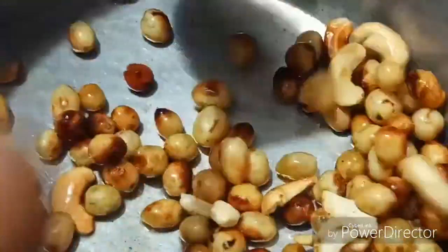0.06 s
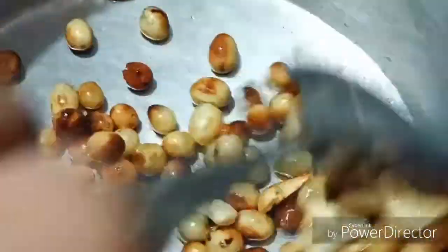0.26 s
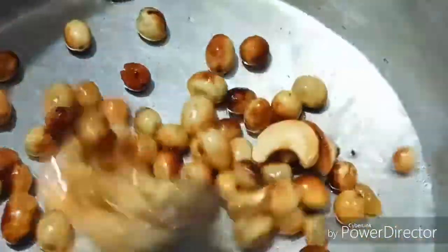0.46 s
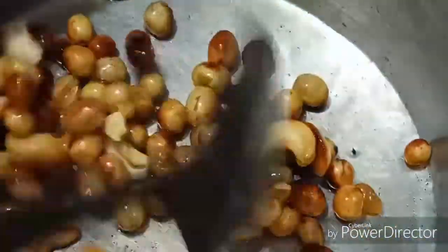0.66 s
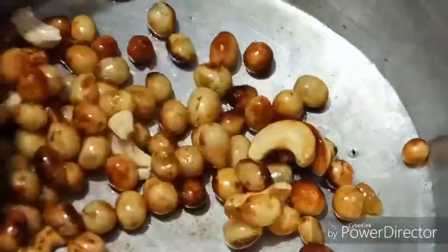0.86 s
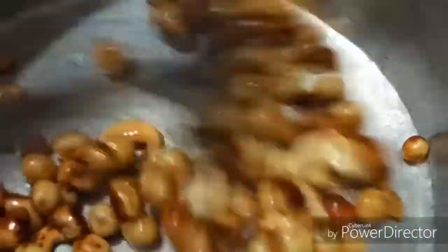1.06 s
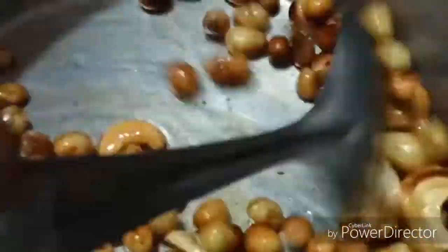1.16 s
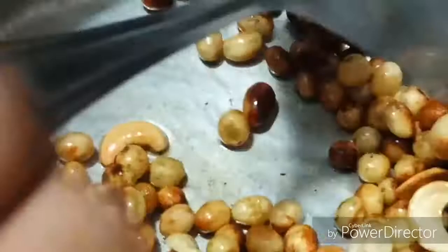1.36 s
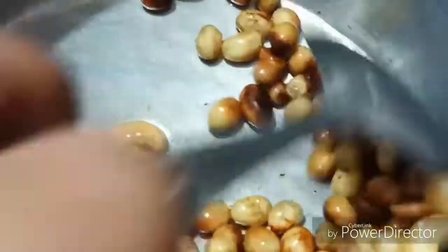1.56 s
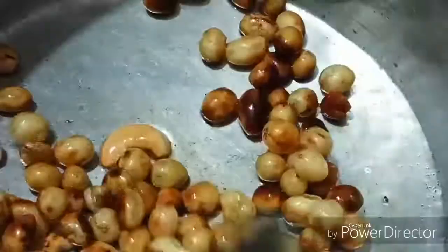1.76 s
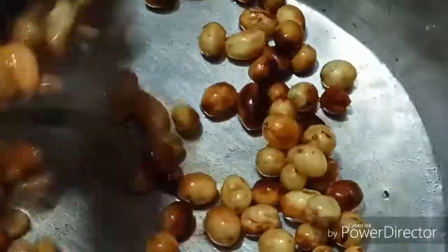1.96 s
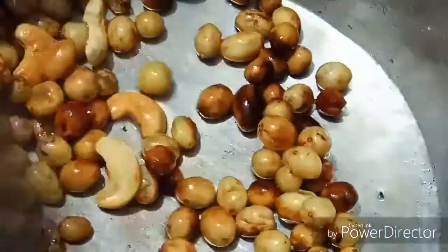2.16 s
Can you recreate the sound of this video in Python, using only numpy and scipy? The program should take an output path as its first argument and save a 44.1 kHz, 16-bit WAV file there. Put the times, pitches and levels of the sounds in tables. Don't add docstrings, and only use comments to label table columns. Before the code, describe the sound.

A metal spoon scrapes and taps a thin steel pan, tumbling rattling nuts in three quick strokes

```python
import sys
import numpy as np
from scipy import signal
from scipy.fft import rfft, irfft
from scipy.io import wavfile
from scipy.ndimage import uniform_filter1d

SR = 44100
rng = np.random.default_rng(int(sys.argv[2]) if len(sys.argv) > 2 else 0)


def put_to_file(sound):
    columns = np.atleast_2d(sound).T
    safe = np.clip(columns, -1, 1)
    whole_steps = np.round(safe * 32767)
    wavfile.write(sys.argv[1], SR, whole_steps.astype(np.int16))


def ratio(d):
    e = np.asarray(d, float) / 20
    return 10 ** e


N = 97020

# pitch_hz [Hz], level_db [dB], t60_s [s]
PAN_FLOOR = [(240, -42, 0.3), (308.5, -10.5, .18), (573, -18.5, 0.32), (640, -46, 0.17), (740, -35, .2),
             (752, -0.5, .2), (785, -8, .3), (834, 6, 0.36), (884.8, 5, .25), (935, -23, .15)]
# pitch_hz [Hz], level_db [dB], t60_s [s]
SPOON = [(784, -22.5, .2), (1017, -12, .2), (1067, -5, .2), (1112, -7.5, .2), (1321, -17, .2),
         (1336, -15, .2), (1405.5, 2.5, 0.3), (1443, -1.5, 0.14), (1525, -2, 0.38), (1577, -5, .25)]
# pitch_hz [Hz], level_db [dB], t60_s [s]
WALL = [(2120, -21.5, 0.36), (2223, 10, 0.091), (2235, 7, 0.053), (2288, 5.5, 0.25), (2630, 2, 0.052),
        (2720, 8, 0.17), (3008, 14, .08), (3160, 11, 0.064), (3410, 2, 0.102), (3643, 4, 0.18),
        (3490, 1.5, .08), (3786, 14, .1), (3994, -2, .08), (4148, 0.5, 0.3)]
# pitch_hz [Hz], level_db [dB], t60_s [s]
RIM = [(4940, 5.7, 0.017), (6036, 5.2, 0.021), (6680, 1.7, 0.15), (8220, 1, 0.01)]
RIM_DB = -10
LONGEST_T60_S = .16


def unit(x):
    return x / np.sqrt(np.mean(x ** 2) + 1e-30)


def conv(x, h):
    return signal.fftconvolve(x, h)[:len(x)]


def band(x, hz, width):
    return signal.lfilter(*signal.iirpeak(hz, hz / width, SR), x)


def colour(x, points):
    hz, db = np.array(points).T
    f = np.arange(len(x) // 2 + 1) * SR / len(x) + 1
    gain = ratio(np.interp(np.log(f), np.log(hz), db))
    return irfft(rfft(x) * gain, len(x))


def walk(rate):
    hold = int(SR / rate)
    levels = np.repeat(rng.standard_normal(200), hold)[:N]
    return 1.2 * uniform_filter1d(levels, hold)


def mode(x, hz, t60):
    r = np.exp(-np.log(1000) / (max(t60, .005) * SR))
    angle = 2 * np.pi * hz / SR
    gain = np.sin(angle) * np.sqrt(4 * (1 - r))
    return signal.lfilter([0, gain], [1, -2 * r * np.cos(angle), r * r], x)


def ring(push, hz, t60):
    y = mode(push, hz, t60)
    return y / np.max(np.abs(y))


def ring_all(push, modes, peak_db):
    return sum(ratio(peak_db + db) * ring(push, hz, t60) for hz, db, t60 in modes)


def chatter():
    rise_s, decay_s = .0015, .0035
    t = np.arange(int(.4 * SR)) / SR
    return (1 - np.exp(-t / rise_s)) * np.exp(-t / decay_s) * rng.standard_normal(len(t))


def add(out, s, x):
    i = int(s * SR)
    out[i:i + len(x)] += x[:N - i]


def burner():
    flame_bands = [(91, 23, -64.5), (122, 25, -68.5), (187, 53, -79.5), (272, 120, -76.5), (62, 40, -82.5)]
    out = np.zeros(N)
    for hz, width, db in flame_bands:
        roar = band(band(rng.standard_normal(N), hz, width), hz, width)
        out += ratio(db) * unit(roar)
    return out


def fat():
    # pitch_hz [Hz], density_db [dB per Hz]
    sizzle_curve = [(120, -30), (200, 1.5), (623, 1.5), (1060, 3), (1140, 0), (4600, 1.5), (5230, -9.5),
                    (14900, -17.5), (16000, -19)]
    # pitch_hz [Hz], width_hz [Hz], level_db [dB]
    sizzle_peaks = [(3600, 520, -9), (6400, 1000, -13)]
    # start_s [s], peak_db [dB], pitch_hz [Hz]
    pop_list = [
        (0.886, -43.5, 4500),
        (0.9011, -41.5, 5915),
        (2.1, -51, 10200),
    ]
    sizzle_db, pop_decay_s = -66.5, 0.0048
    hiss = unit(colour(rng.standard_normal(N), sizzle_curve))
    for hz, width, db in sizzle_peaks:
        peak = unit(band(rng.standard_normal(N), hz, width))
        hiss = hiss + ratio(db + 3.1 * walk(7.94)) * peak
    out = unit(hiss) * ratio(sizzle_db + 0.24 * walk(0.62))
    t = np.arange(800) / SR
    for s, db, hz in pop_list:
        burst = rng.standard_normal(len(t)) * np.exp(-t / pop_decay_s)
        add(out, s, ratio(db) * band(burst, hz, hz * 0.13))
    return out


def kitchen(x):
    t60_s, gap_s = 0.1, .004
    t = np.arange(SR // 2) / SR
    room = rng.standard_normal(len(t)) * np.exp(-np.log(1000) * t / t60_s) * (t > gap_s)
    return conv(x, room / np.sqrt(np.sum(room ** 2)))


def nuts(push):
    knocks_per_s, lowest_hz, t60_s = 45, 1122, 0.09
    level_db, tilt_db = -7.5, -0.43
    press, out = uniform_filter1d(np.abs(push), 400), 0
    for k in range(11):
        hits = rng.random(N) < knocks_per_s / SR
        knocks = hits * rng.standard_normal(N) * np.sqrt(SR / knocks_per_s)
        out = out + mode(press * knocks * ratio(tilt_db * k), lowest_hz * 2 ** (k / 5), t60_s)
    return ratio(level_db - 6.0) * out


def rattle(push):
    rattle_curve = [(150, -27.5), (400, -6.5), (800, -2.5), (4250, 8), (4700, -14.5), (7000, -17.5),
                    (9000, -17.5), (15000, -29.5)]
    t60_s = 0.04
    t = np.arange(N) / SR
    tail = colour(rng.standard_normal(N), rattle_curve) * np.exp(-np.log(1000) * t / t60_s)
    return conv(push, tail[:SR // 4] / np.sqrt(np.sum(tail ** 2)))


def air(push):
    lowest_hz, level_db, tilt_db, flicker_db = 6800, 8, 0., 3
    out = 0
    for k, hz in enumerate(lowest_hz * 1.045 ** np.arange(20)):
        flicker = ratio(flicker_db * walk(35) + tilt_db * k)
        out = out + band(band(push * flicker, hz, hz / 20), hz, hz / 10)
    return ratio(level_db) * out


def scrape():
    # start_s [s], pressure_db [dB], flat_on_floor_db [dB], edge_grit_db [dB],
    # sliding_hiss_db [dB]
    stroke_curves = [
        [(.25, -46, -14, 9.5, -51), (.275, -46, 4, 5.5, -66), (.29, -36, 14.5, 6, -55),
         (.322, -41, 12.5, -22, -77), (.338, -41.5, 8.5, -8, -53.5), (.37, -44, 7, 2.5, -52),
         (.42, -47.5, -14, -1.5, -62)],
        [(.42, -38.5, -18, -1, -53), (.455, -33.5, -25, -2, -47), (.49, -46.5, 16, 2, -59),
         (.52, -31, 0.5, 2.5, -45), (.565, -29, 2, -8, -60), (.608, -36.5, 3, 0.5, -49.5),
         (.624, -43.5, 1, -10, -73), (.65, -60, 13, 2, -63), (.77, -71, -7.5, -0.5, -74)],
        [(1.015, -47, -0.5, -3, -76), (1.1, -65, 1, 0.5, -67.5), (1.118, -46.5, -25, 1, -66),
         (1.155, -40, -40, -3, -58), (1.168, -32, -45, 0.5, -53), (1.22, -23.5, -17, -11, -47),
         (1.255, -29, -41, -5.5, -48), (1.28, -49, 12.5, -6, -69), (1.36, -78.5, -6, 9, -85)],
        [(1.58, -51.5, -10.5, 6.5, -61.5), (1.635, -57, 5, -0.5, -69), (1.665, -44.5, 6, -10.5, -71),
         (1.745, -36, -45, -3.5, -63), (1.775, -36, -7, -3, -47.5), (1.82, -34.5, 3, -3.5, -53)],
        [(1.82, -37, 6.5, -0.5, -47), (1.88, -34.5, 9, 3.5, -58), (1.925, -40, 9.5, 3, -57),
         (1.945, -36, 0, 3.5, -48), (1.972, -45.5, 8.5, -4, -69), (2.02, -55.5, -0.5, -8.5, -68),
         (2.075, -49.5, 5.5, 4, -76), (2.11, -70, 6, 5, -66), (2.16, -76, -12, 6, -93)],
    ]
    ticks_per_s, tick_spread_db, grind_db = 2500, 1, 1.5
    clump_db, clumps_per_s, edge_low_hz = 1.5, 80, 900
    t, force = np.arange(N) / SR, np.zeros((4, N))
    slips = rng.random(N) < ticks_per_s / SR
    strength = ratio(-tick_spread_db * np.log(rng.random(N) + 1e-9))
    ticks = slips * strength * rng.standard_normal(N)
    grit = unit(ticks) + ratio(grind_db) * rng.standard_normal(N)
    for stroke in stroke_curves:
        s, db, flat_db, edge_db, hiss_db = np.array(stroke).T
        press = np.interp(t, s, db, left=-120, right=-120)
        force[0] += ratio(press + np.interp(t, s, flat_db))
        force[1] += ratio(press)
        force[2] += ratio(press + np.interp(t, s, edge_db))
        force[3] += ratio(np.interp(t, s, hiss_db, left=-120, right=-120))
    force = force * unit(grit * ratio(clump_db * walk(clumps_per_s)))
    force[1:] = signal.lfilter(*signal.butter(2, edge_low_hz, "high", fs=SR), force[1:])
    return force


def steel(force):
    wander_db, wander_per_s, damping = 3, 30, .5
    floor, spoon, edge = force[:3]
    out = 0
    for push, table, part_db in [(floor, PAN_FLOOR, 0), (spoon, SPOON, 0), (edge, WALL, 0),
                                 (edge, RIM, RIM_DB)]:
        total = np.sqrt(np.sum(ratio(np.array(table)[:, 1]) ** 2))
        for hz, db, t60 in table:
            gain = ratio(db + part_db + wander_db * walk(wander_per_s)) / total
            out = out + mode(push * gain, hz, min(t60, LONGEST_T60_S) * damping)
    return out


def drag_body(force):
    flat_rattle_db, top_hz = -13, 7500
    body = steel(force) + rattle(force[2] + ratio(flat_rattle_db) * force[0])
    return signal.sosfilt(signal.butter(4, top_hz, fs=SR, output="sos"), body)


def clinks(out, shake):
    # (pitch_hz [Hz], level_db [dB], t60_s [s])
    clink_list = [
        (0.2426, -21.5, [(1560, -16, 0.15), (2280, -12, 0.026), (3230, -12.5, 0.028), (3820, 4.5, 0.02), (4050, -2.5, 0.054), (5020, -7, 0.026), (6060, -9.5, 0.014), (6900, -10, 0.013)]),
        (0.4221, -26.5, [(1560, -5.5, 0.057), (2150, -5, 0.11), (3880, -1, 0.1), (4048, -0.5, 0.1), (4148, -1.5, 0.18), (6864, -3, 0.081)]),
        (0.504, -14.5, [(840, -9, 0.066), (2146, -12.5, 0.066), (2920, -16, 0.044), (3700, -9.5, 0.019), (3913, 0, 0.02), (4057, 4, 0.054), (6090, -4, 0.01), (6790, -12.5, 0.025)]),
    ]
    rattle_db, click_db = -10, -25
    for s, db, modes in clink_list:
        push = chatter()
        click = signal.lfilter([1, -1], 1, push)
        add(out, s, ring_all(push, modes, db) + ratio(db + click_db) * click)
        add(shake, s, push * ratio(db + rattle_db))


def landings(out, shake):
    # (pitch_hz [Hz], level_db [dB], t60_s [s])
    landing_list = [
        (0.2811, -5.5, [(662, -12, 0.077), (752, -7.5, 0.053), (840, -3.5, 0.078), (1402, -3.5, 0.027), (1565, -30, 0.14), (2730, -17, 0.026), (3356, -1.5, 0.0033), (4200, -40, 0.083), (6260, -14, 0.0044)]),
        (1.0087, -34, [(785, -9.5, 0.63), (1068, -9.5, 0.45), (1307, -7.5, 0.24), (1550, 2, 0.044), (2123, -3, 0.13), (2410, -5, 0.045), (2680, -5, 0.087), (4025, 1, 0.071)]),
        (1.574, -32.5, [(1562, 0, 0.16), (2747, 5, 0.088), (3180, -23.5, 0.21), (3946, -1, 0.084), (4082, 4.5, 0.063), (6200, -3.5, 0.018), (6800, -15.5, 0.037)]),
        (1.64, -24.5, [(642, -4.5, 0.022), (722, -5.5, .04), (827, -2, 0.028), (1430, 3, 0.019), (2210, -17.5, 0.022), (2670, -5.5, 0.033), (3230, -13, 0.03), (3630, -5.5, 0.047)]),
    ]
    low_hz, top_hz, rattle_db = 520, 5000, -13
    for s, db, modes in landing_list:
        push = signal.lfilter(*signal.butter(2, [low_hz, top_hz], "band", fs=SR), chatter())
        add(out, s, ring_all(push, modes, db))
        add(shake, s, push * ratio(db + rattle_db))


def taps(out, shake):
    tap_list = [(.487, -21.5, 17, -14, 3700), (.517, -49, -7, 14, 2050), (.540, -15, 9, -1.5, 3820),
                (.5605, -15.5, -17.5, -2, 2720), (.580, -17, 27, -5, 2990), (.668, -30.5, -2, 9.5, 2040),
                (.706, -35.5, 9.5, -11, 3600), (1.1155, -38.5, -20, 5, 2300), (1.138, -30, -19, 25, 3720),
                (1.161, -29.5, -30, 1, 3780), (1.192, -27, -29, 17, 3160), (1.2125, -21.5, -19, -5, 3410),
                (1.2215, -20, -32, -16, 3470), (1.2385, -13.5, -38, 2.5, 2680), (1.254, -26.5, 6, 9, 3130),
                (1.684, -25.5, 13, 14, 3200), (1.731, -24.5, -5, 28, 2200), (1.779, -21, -6, -3, 2630),
                (1.826, -15, -4.5, -33, 4130), (1.8415, -13, -9, 0.5, 4148), (1.865, -12, 29, 25, 4000),
                (1.889, -18, 10, 8, 2230), (1.912, -27, -6, 3, 3000), (1.945, -23, -10, -16, 2280),
                (2.0405, -32.5, 4, 6, 4120), (2.068, -40, -5, 8, 2680)]
    top_hz, scatter_db, favour_db_per_octave = 7000, 1.5, 40
    rattle_db, damping = -14, .6
    for s, db, floor_db, spoon_db, near_hz in tap_list:
        push = signal.lfilter(*signal.butter(2, top_hz, fs=SR), chatter())
        wall = []
        for hz, mode_db, t60 in WALL:
            loss_db = min(favour_db_per_octave * abs(np.log2(hz / near_hz)), 14)
            wall.append((hz, mode_db - loss_db, t60))
        tap = 0
        for table, part_db in [(PAN_FLOOR, floor_db), (SPOON, spoon_db), (wall, 0), (RIM, RIM_DB)]:
            for hz, mode_db, t60 in table:
                gain = ratio(part_db + mode_db + scatter_db * rng.standard_normal())
                tap = tap + gain * ring(push, hz, min(t60, LONGEST_T60_S) * damping)
        add(out, s, ratio(db) * tap / np.max(np.abs(tap)))
        add(shake, s, push * ratio(db + rattle_db))


def blows():
    out, shake = np.zeros(N), np.zeros(N)
    clinks(out, shake)
    landings(out, shake)
    taps(out, shake)
    return out + rattle(shake)


def scene():
    kitchen_db, mic_low_hz = -13.5, 162
    thump_hz, thump_db = 70, -26.5
    force = scrape()
    pan = blows() + drag_body(force) + air(force[3]) + nuts(force[2])
    mic = signal.butter(3, mic_low_hz, "high", fs=SR, output="sos")
    close = signal.sosfilt(mic, pan + ratio(kitchen_db) * kitchen(pan))
    thump = ratio(thump_db) * band(pan, thump_hz, 60)
    return (close + thump + fat() + burner())[None]


def band_limit(x):
    return signal.sosfilt(signal.butter(12, 16790, fs=SR, output="sos"), x)


def record(dry):
    top_hz = 15750
    dull = signal.sosfilt(signal.ellip(10, .3, 70, top_hz, fs=SR, output="sos"), dry)
    return band_limit(dull)


dry = scene()
out = record(dry)
put_to_file(out)
```